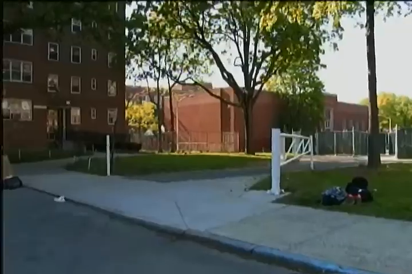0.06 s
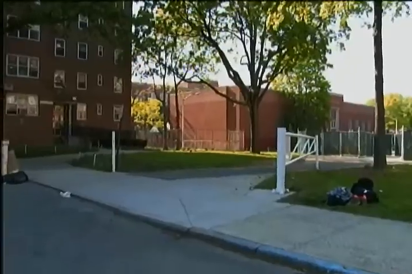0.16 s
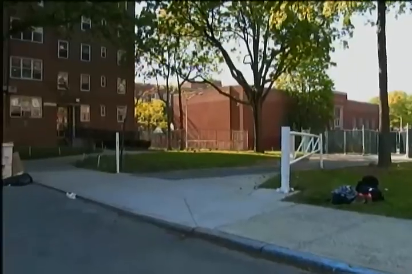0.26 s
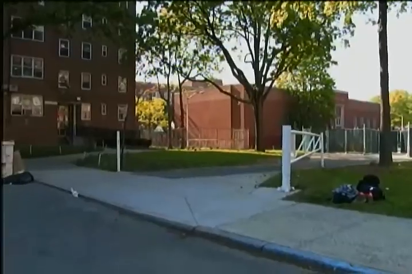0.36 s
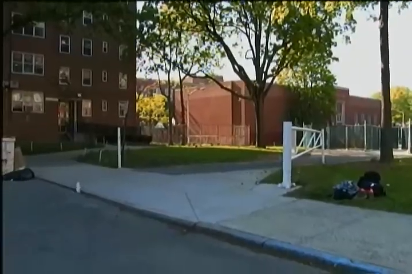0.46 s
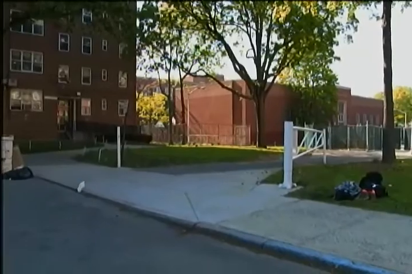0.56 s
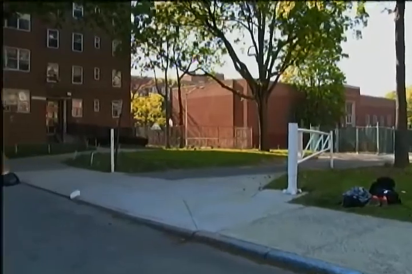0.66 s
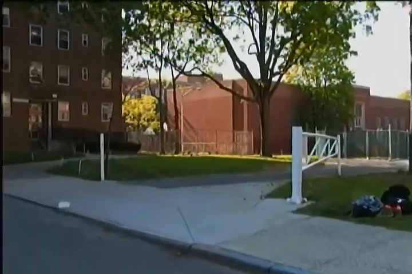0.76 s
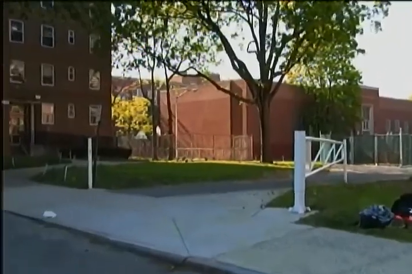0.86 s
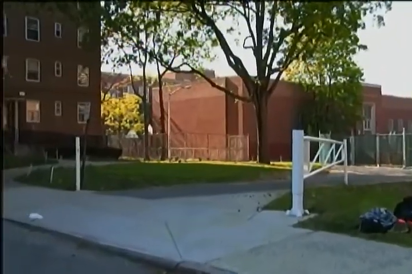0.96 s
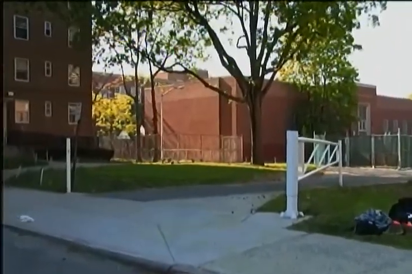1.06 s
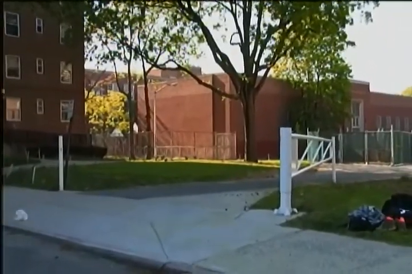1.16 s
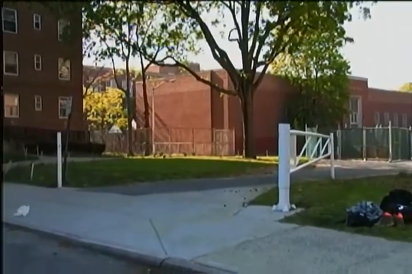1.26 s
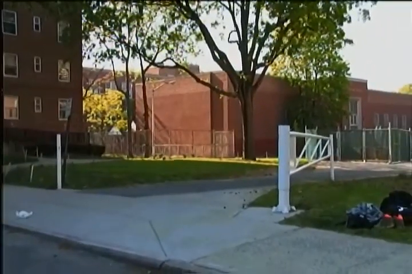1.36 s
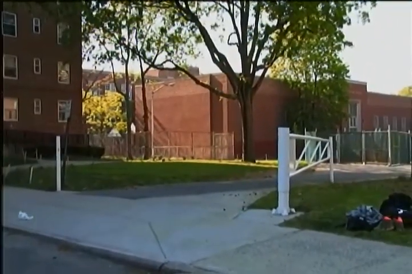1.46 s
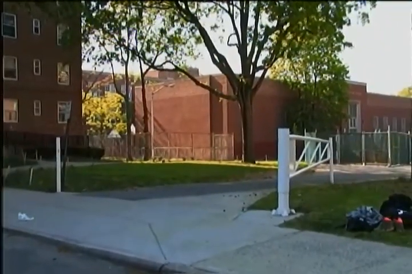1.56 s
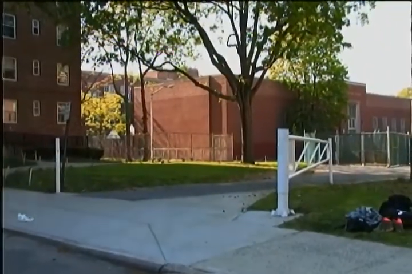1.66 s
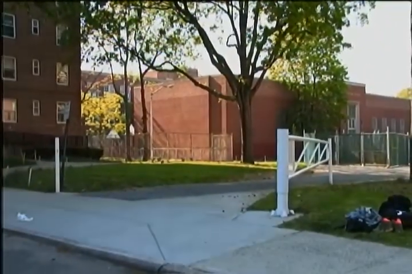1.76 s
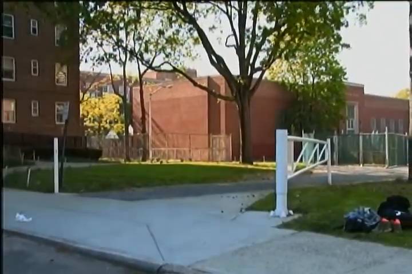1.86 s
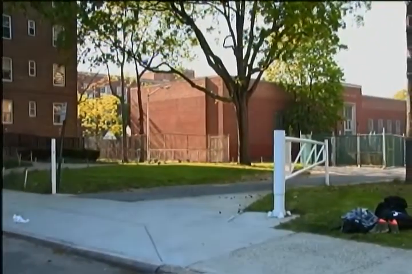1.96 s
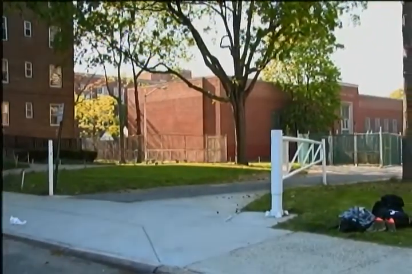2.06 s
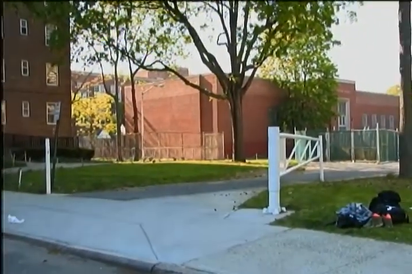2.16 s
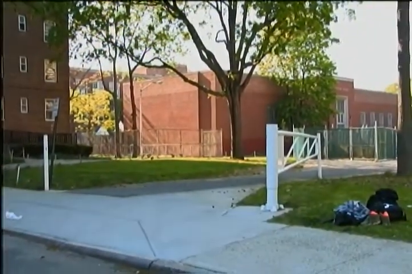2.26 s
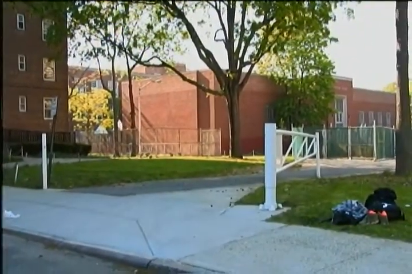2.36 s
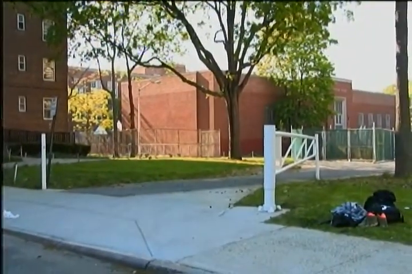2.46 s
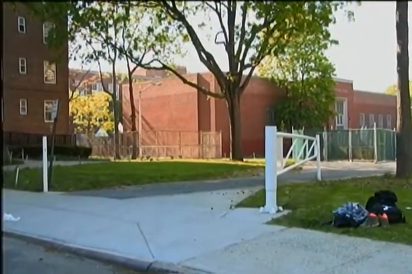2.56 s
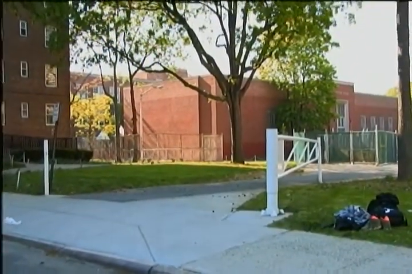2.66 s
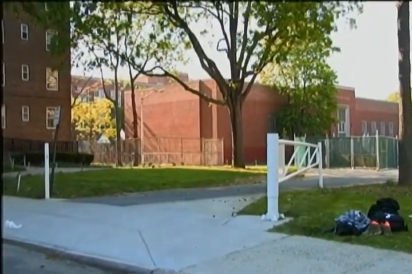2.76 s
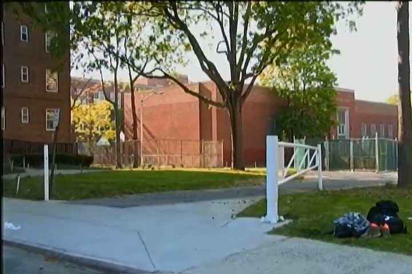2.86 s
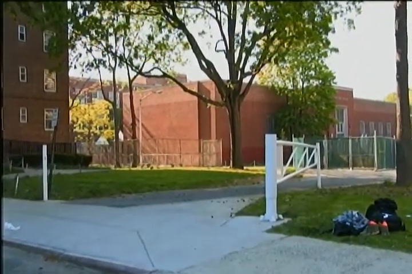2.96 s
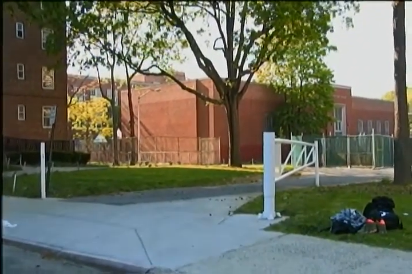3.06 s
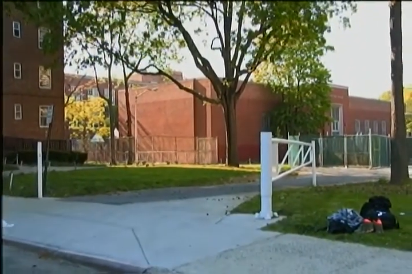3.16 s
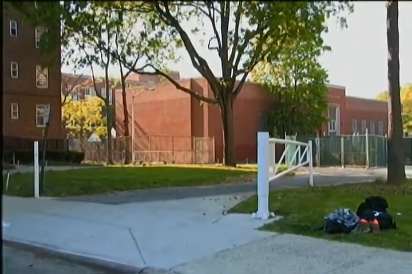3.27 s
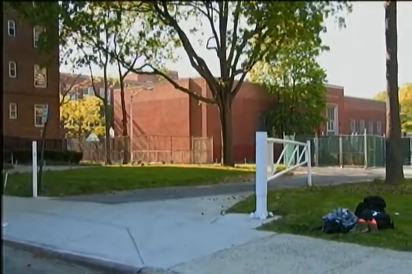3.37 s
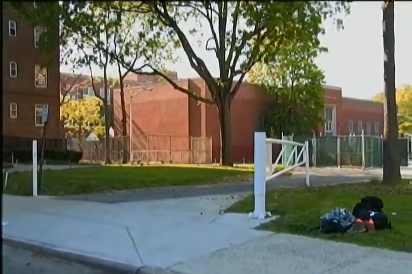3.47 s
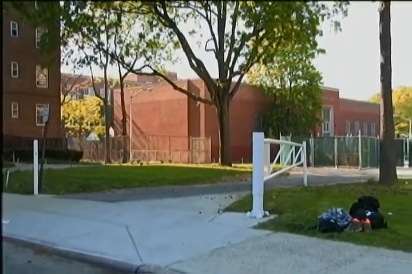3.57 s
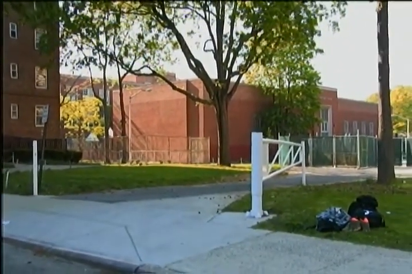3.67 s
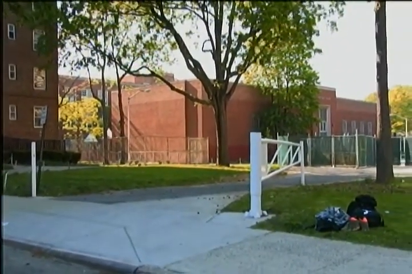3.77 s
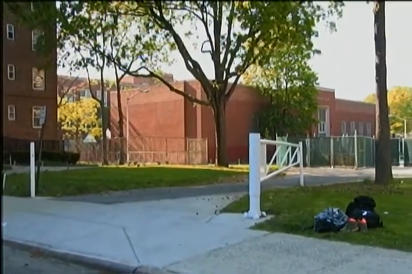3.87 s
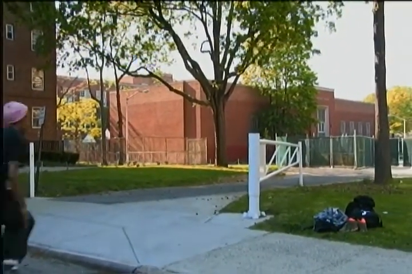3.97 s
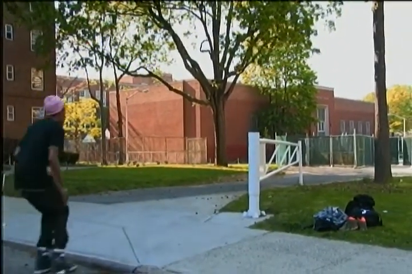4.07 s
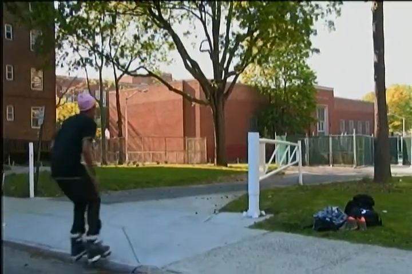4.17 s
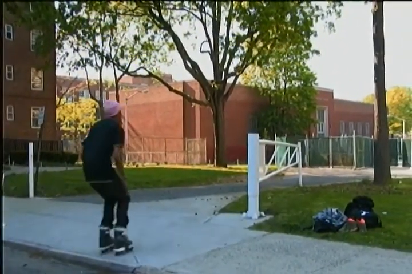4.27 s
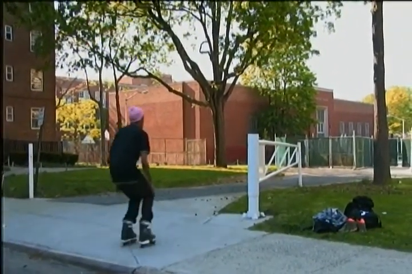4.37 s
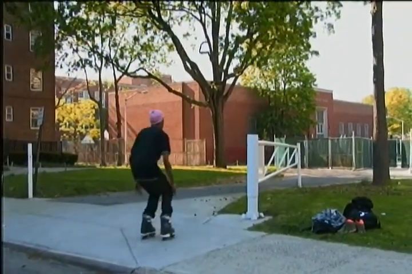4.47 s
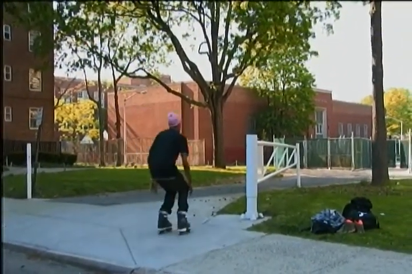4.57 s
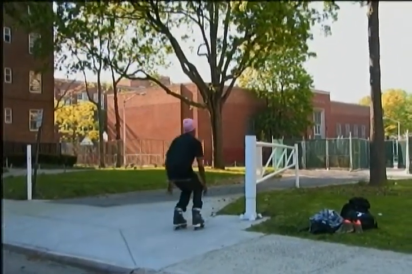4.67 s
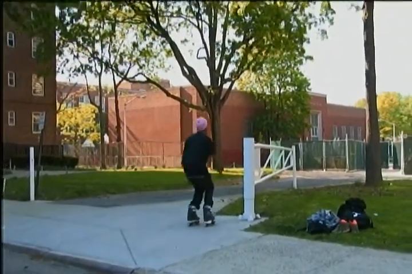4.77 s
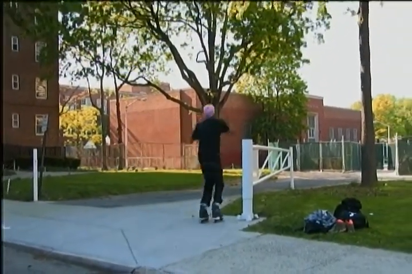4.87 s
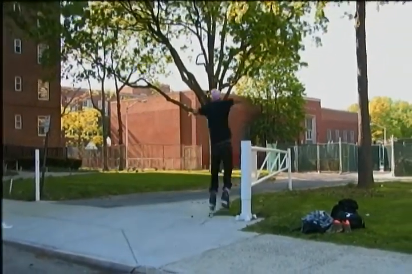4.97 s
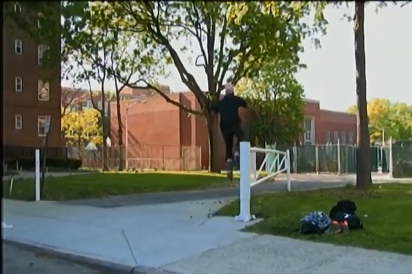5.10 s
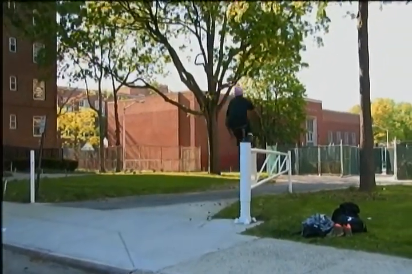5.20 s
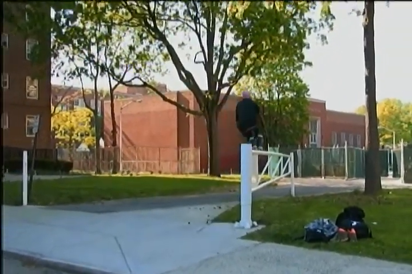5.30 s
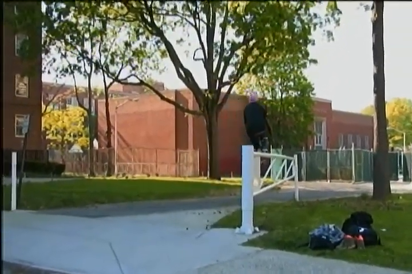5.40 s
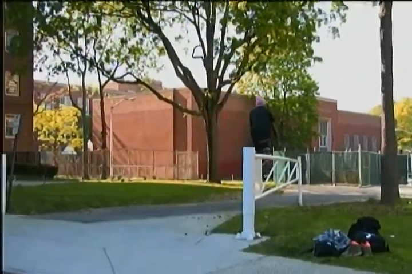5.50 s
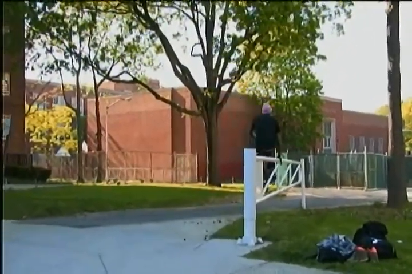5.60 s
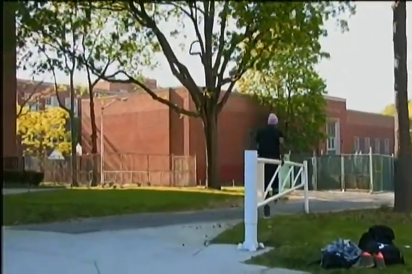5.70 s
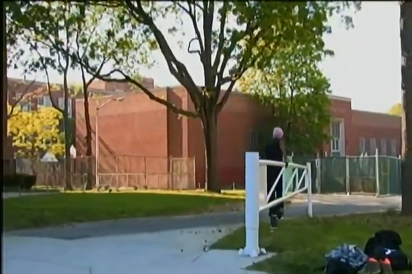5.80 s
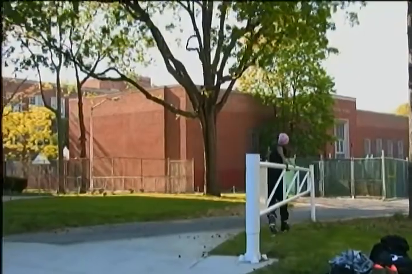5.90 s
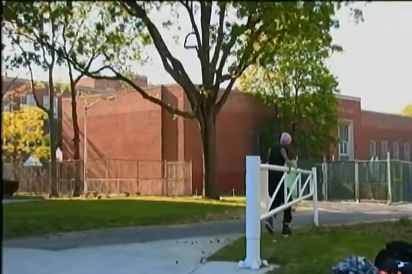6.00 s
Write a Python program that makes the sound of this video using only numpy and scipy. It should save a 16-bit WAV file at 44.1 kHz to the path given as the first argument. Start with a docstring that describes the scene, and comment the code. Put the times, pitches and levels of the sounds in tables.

```python
"""Inline skater grinds a gate.

Wheels roll up a quiet asphalt street from the left, hop the kerb and clack over sidewalk joints.
After a leap the soles grind along a hollow steel gate, whose tubes ring, and the skates thud on grass.
Far traffic rumbles, wind puffs on the microphone and brick walls throw back a faint echo."""
import sys
import numpy as np
from scipy import signal
from scipy.fft import rfft, irfft, next_fast_len
from scipy.io import wavfile
from scipy.ndimage import map_coordinates

SR = 44100
rng = np.random.default_rng(int(sys.argv[2]) if len(sys.argv) > 2 else 0)


def store_pcm(level_fs):
    """Save levels as 16-bit WAV."""
    pcm = np.round(np.clip(level_fs, -1, 1) * 32767).astype(np.int16)
    wavfile.write(sys.argv[1], SR, np.atleast_2d(pcm).T)


N = 266348
TIME = np.arange(N) / SR
SPEED_M_PER_S, NEAREST_M, NEAREST_S = 4.37, 3.1, 4
HOP_S, SIDEWALK_S, LEAP_S = 4.05, 4.25, 4.745


def rolling():
    """Wheels ride over stones and sand, which shake the frames and boot shells."""
    level_db = wheel_level_db()
    beyond_m = distance_m() - NEAREST_M
    load = drift(per_s=70)    # uneven ground varies the wheel pressure
    stones = grains(per_s=1300, spread_db=2.5)
    sand = grains(per_s=1800, spread_db=4)
    return ground_reflection(rumble(level_db, load, stones)
                             + roar(level_db, load, stones, beyond_m)
                             + grit(level_db, load, stones, sand, beyond_m))


# Wheel drive on asphalt: (time [s], level [dB])
ASPHALT_DRIVE = [(0.0, -58.5), (0.33, -57), (0.6, -53), (0.68, -46.5), (0.86, -45.5), (0.99, -45),
                 (1.15, -48.5), (1.27, -48.5), (1.45, -50.5), (1.62, -48.5), (1.72, -51), (1.98, -49),
                 (2.09, -43), (2.25, -40.5), (2.47, -35), (2.7, -35.5), (2.88, -35.5), (2.99, -39),
                 (3.08, -35), (3.35, -32.5), (3.55, -35), (3.64, -40), (3.71, -35), (3.8, -36.5),
                 (3.91, -37.5), (4.0, -37)]


def wheel_level_db(hop_fall_db_per_s=312, concrete_db=-50, leap_fall_db_per_s=41):
    """Loud on asphalt, dying away in the hop, softer on concrete, spinning out in the leap."""
    asphalt_db, = in_time(ASPHALT_DRIVE)
    street_db = asphalt_db + 1 - hop_fall_db_per_s * since(HOP_S)
    sidewalk_db = concrete_db - leap_fall_db_per_s * since(LEAP_S)
    return np.where(TIME < SIDEWALK_S, street_db, sidewalk_db)


# Rumble spectrum: (frequency [Hz], density [dB])
RUMBLE_SPECTRUM = [(35, -28), (60, -11), (130, -6.5), (220, -1), (310, 0.5), (540, -3), (750, -11.5),
                   (1200, -22.5), (2500, -57)]
# Hollow-sounding drone in the rolling: (time [s], centre [Hz], gain [dB])
ROLLING_DRONE = [(0.0, 506, -16), (2.0, 478, -4), (2.55, 502, -5), (2.72, 383, -10), (2.86, 340, 1),
                 (2.96, 415, -11), (3.1, 302, -5), (3.21, 370, -7), (3.33, 436, -10), (3.46, 262, -3),
                 (3.57, 251, -2), (3.68, 272, -8), (4.0, 255, -0.5), (4.25, 270, -20)]


def rumble(level_db, load, stones):
    """Rough ground shakes the wheels; a drone wavers and falls in pitch as the skater nears."""
    drone_hz, drone_db = in_time(ROLLING_DRONE)
    drone = from_db(drone_db) * swept(grains(per_s=3000, spread_db=0.5), drone_hz, width_hz=51)
    roughness = 0.81 * grains(per_s=700, spread_db=0.5) + 0.71 * stones
    return from_db(level_db + 0.21 * load) * (0.8 * coloured(roughness, RUMBLE_SPECTRUM) + drone)


# Roar spectrum: (frequency [Hz], density [dB])
ROAR_SPECTRUM = [(400, -17), (750, 3.5), (950, 3.5), (1200, -1.5), (1650, -1), (2000, -2), (2270, 8),
                 (2600, -5), (3100, -16.5), (5000, -29)]
# Boot shell resonances: (centre [Hz], width [Hz], gain [dB])
SHELL_MODES = [(720, 90, -11), (1230, 120, -10), (1700, 180, -14), (2280, 170, -6)]


def roar(level_db, load, stones, beyond_m, loss_db_per_m=0.27):
    """Stones drive the boot shells into a surging roar."""
    mean_db = level_db - 5.5 - loss_db_per_m * beyond_m
    flutter_db = 1.2 * load + drift(per_s=16)
    shells = 0.86 * coloured(stones, ROAR_SPECTRUM) + wandering_modes(stones, SHELL_MODES)
    return from_db(mean_db + flutter_db) * shells


# Grit spectrum: (frequency [Hz], density [dB])
GRIT_SPECTRUM = [(1200, -5), (3000, -4), (4000, 3), (5300, -12), (7000, -8.5), (9000, -7.5), (10500, -7),
                 (12000, -7), (16000, -24)]
# Wheel and bearing resonances: (centre [Hz], width [Hz], gain [dB])
BEARING_MODES = [(3450, 250, -11), (4150, 250, -9), (6800, 400, -19)]


def grit(level_db, load, stones, sand, beyond_m, loss_db_per_m=2.5, concrete_boost_db=2):
    """Grit hisses under the wheels and rings the bearings; it fades fast with distance."""
    mean_db = level_db - 12.5 - loss_db_per_m * beyond_m + concrete_boost_db * (TIME > SIDEWALK_S)
    flutter_db = 1.6 * load + 2 * drift(per_s=250)
    hiss = coloured(0.45 * stones + 0.67 * sand, GRIT_SPECTRUM)
    return from_db(mean_db + flutter_db) * (hiss + wandering_modes(sand, BEARING_MODES))


# Strikes on cracks, stones, kerb and joints:
# (time [s], thump [dB], clack [dB], crack [dB], frame ring [Hz], wheel ring [Hz])
WHEEL_STRIKES = [(0.0795, -48, -44, -60, 2170, 2750), (0.328, -44, -44.5, -66, 1120, 2600),
                 (0.374, -43.5, -43, -72, 1480, 2950), (0.638, -34.5, -35.5, -54, 650, 3450),
                 (0.677, -36.5, -32, -46.5, 1250, 2700), (0.786, -44, -39.5, -64, 2190, 2600),
                 (0.805, -37, -37, -65, 1590, 2600), (0.949, -36.5, -39.5, -57, 1200, 2600),
                 (1.016, -37, -48, -59, 1840, 2720), (1.046, -40, -44.5, -60, 2240, 2780),
                 (1.07, -40, -31.5, -60, 2240, 2600), (1.083, -44, -38, -60, 1260, 2750),
                 (1.092, -39, -44, -60, 1120, 2600), (1.122, -37, -34.5, -40, 1820, 2880),
                 (1.332, -36.5, -39, -53, 1300, 3300), (1.348, -44, -39, -56, 1140, 2670),
                 (1.379, -35, -32.5, -40, 1240, 7050), (1.528, -35.5, -39.5, -53, 550, 2780),
                 (1.792, -43, -42, -58, 1250, 2750), (1.823, -42, -41, -57, 1200, 2620),
                 (1.839, -38.5, -36.5, -58, 1380, 3250), (2.28, -37, -30.5, -55, 2280, 2860),
                 (2.314, -34, -29.5, -48, 800, 3200), (2.812, -40, -34, -44, 2240, 2580),
                 (2.863, -40, -32, -45, 1190, 2570), (3.212, -39, -33, -36.5, 2300, 2700),
                 (3.672, -35, -28, -39, 2100, 3980), (3.754, -34, -31.5, -44, 1050, 3600),
                 (3.842, -33, -34, -40, 800, 3990), (3.851, -33, -38, -48.5, 2300, 3580),
                 (3.955, -30, -30, -34, 1190, 3500), (3.986, -31.5, -31, -46, 1100, 2840),
                 (3.993, -28.5, -44, -38, 800, 7000), (4.007, -48, -25.5, -34, 1250, 4060),
                 (4.032, -30.5, -27, -30.5, 2360, 3630), (4.043, -30, -24.5, -40, 1930, 3600),
                 (4.054, -39, -31, -58, 2200, 2600), (4.208, -37, -30, -34.5, 1150, 4060),
                 (4.232, -28.5, -29.5, -37.5, 630, 4360), (4.241, -29.5, -32, -38, 1070, 4220),
                 (4.248, -30.5, -43, -36, 2270, 3370), (4.264, -37, -32, -37.5, 1090, 4540),
                 (4.324, -40, -33.5, -47, 1120, 4040), (4.333, -35, -37, -41.5, 590, 4800),
                 (4.392, -44, -35, -39, 1980, 3250), (4.4681, -39.5, -34.5, -43, 2080, 3980),
                 (4.486, -40, -31, -42, 2130, 4400), (4.494, -39, -43, -47, 2190, 3380),
                 (4.5253, -39, -30.5, -42, 1070, 4100), (4.551, -43, -32, -39, 2140, 3500),
                 (4.709, -38.5, -33.5, -43.5, 1120, 3270), (4.783, -42, -32.5, -36, 1160, 3190)]
# Boot thump spectrum: (frequency [Hz], density [dB])
THUMP_SPECTRUM = [(40, -16), (90, -2), (160, 1.5), (270, 4), (400, -7.5), (560, -2.5), (900, -25.5),
                  (2500, -36)]
# Frame clack spectrum: (frequency [Hz], density [dB])
CLACK_SPECTRUM = [(200, 0), (600, 7.5), (900, -1), (1220, 0.5), (1600, -5), (2200, 3.5), (2700, -8.5),
                  (4200, -13.5), (8000, -18), (15000, -43)]
# Wheel crack spectrum: (frequency [Hz], density [dB])
CRACK_SPECTRUM = [(1500, -14), (2700, -1), (4000, 2), (5300, -5), (7000, -3), (10000, -5.5), (12000, -9),
                  (15500, -24)]


def bumps():
    """A wheel meets an edge: the boot thumps, the frame clacks, the wheel cracks; both ring briefly."""
    s, thump_db, clack_db, crack_db, frame_hz, wheel_hz = np.transpose(WHEEL_STRIKES)
    thump = pushes(s + 0.00075, thump_db + 0.5) + blows(s + 0.0019, thump_db - 4.5, contact_s=0.0063)
    scuff = blows(s - 0.003, clack_db - 17, contact_s=0.00034)
    clack = (pushes(s + 0.0005, clack_db - 12.5)
             + blows(s, clack_db - 6, contact_s=0.0013)
             + blows(s + 0.00204, clack_db - 9.5, contact_s=0.0045))
    crack = (blows(s - 0.003, crack_db - 17, contact_s=0.0008)
             + blows(s, crack_db - 4, contact_s=0.00094)
             + blows(s + 0.001013, crack_db - 14.5, contact_s=0.0015))
    frame_ring = pings(s + 0.0007, clack_db - 2, frame_hz, t60_s=0.021)
    wheel_ring = pings(s + 0.0007, crack_db + 6, wheel_hz, t60_s=0.01)
    return (coloured(thump, THUMP_SPECTRUM) + coloured(scuff + clack, CLACK_SPECTRUM)
            + coloured(crack, CRACK_SPECTRUM) + frame_ring + wheel_ring)


def pebbles(per_s=14, gain_db=-6, spread_db=2):
    """Wheels crunch over loose stones at random until the leap."""
    gap_draw, size_draw = rng.random((200, 2)).T
    s = np.cumsum(-np.log(1 - gap_draw)) / per_s
    db = np.interp(s, TIME, wheel_level_db()) + gain_db + spread_db * (2 * size_draw - 1)
    return coloured(blows(s[s < LEAP_S], db[s < LEAP_S], contact_s=0.0012), CLACK_SPECTRUM)


def sand_ticks(per_s=220, band_hz=(5600, 11000), gain_db=-14.5):
    """Single sand grains tick under the wheels on smooth concrete."""
    ticks = rms_one(signal.sosfilt(bandpass(2, band_hz), grains(per_s, spread_db=4) + 1e-18))
    return from_db(wheel_level_db() + gain_db) * (TIME > SIDEWALK_S) * ticks


# Sideways slips: (time [s], half-length [s], level [dB], centre [Hz], width [Hz])
WHEEL_SKIDS = [(0.658, .025, -53, 1210, 500), (1.091, 0.035, -47, 1280, 497), (2.82, .03, -45.5, 3700, 900),
               (2.919, 0.009, -44, 3650, 900), (3.294, .07, -48, 10500, 500),
               (4.039, 0.0099, -39.5, 9050, 2200), (4.246, 0.0057, -53, 8500, 1800)]


def skids():
    """Wheels scuff sideways over grit."""
    out = np.zeros(N)
    for s, half_length_s, db, hz, width_hz in WHEEL_SKIDS:
        envelope = from_db(db) * np.exp(-((TIME - s) / half_length_s) ** 2)
        out += envelope * swept(grains(per_s=2500, spread_db=2), np.full(N, hz), width_hz)
    return out


# Boot and frame knocks on the gate: (time [s], knock [dB], favoured mode [Hz], ring [dB])
GATE_KNOCKS = [(5.238, -17.5, 529, -35.5), (5.255, -19, 1561, -26), (5.274, -21, 720, -29),
               (5.334, -22.5, 868, -33), (5.398, -24, 282, -36.5), (5.452, -30, 222, -28.5),
               (5.505, -20.5, 1225, -21), (5.514, -18, 1561, -28.5), (5.549, -17, 640, -29.5),
               (5.563, -18, 1225, -24), (5.574, -22, 640, -22.5), (5.604, -26, 222, -25),
               (5.743, -28, 222, -30), (5.77, -33, 1225, -42), (5.946, -35, 1092, -48)]
# Low grind spectrum: (frequency [Hz], density [dB])
BOOM_SPECTRUM = [(40, -23), (110, -12), (150, -23), (190, 0), (222, -9.5), (255, -8.5), (295, -5.5),
                 (370, -15.5), (700, -20.5)]
# Middle grind spectrum: (frequency [Hz], density [dB])
SCRAPE_SPECTRUM = [(300, -17), (460, -10), (560, -12), (645, 1.5), (760, -13), (1000, -9), (1220, -4),
                   (1330, -19), (1600, -11), (1850, -15), (3500, -19.5)]
# High grind spectrum: (frequency [Hz], density [dB])
HISS_SPECTRUM = [(1200, -17), (2300, -1.5), (3100, -5.5), (4500, 2.5), (5300, -11), (6600, 1.5), (7800, -9),
                 (9000, -1), (11000, -3.5), (15500, -27)]


def grind(judder_db=1.4):
    """Soles judder and knock along the gate; friction sets its tubes booming and ringing."""
    forces = sliding_forces() * from_db(judder_db * drift(per_s=110))
    low, middle, high = forces
    slips = middle * from_db(-5) * grains(per_s=1500, spread_db=1)
    s, knock_db, _, _ = np.transpose(GATE_KNOCKS)
    knocks = blows(s, knock_db - 11, contact_s=0.0029)
    brightness_db = 0.5 * (knock_db - knock_db.max())    # hard knocks are brighter
    cracks = blows(s, knock_db - 17.5 + brightness_db, contact_s=0.013)
    boom = coloured(low * from_db(1.8) * grains(per_s=4000, spread_db=-2), BOOM_SPECTRUM)
    scrape = coloured(slips + knocks, SCRAPE_SPECTRUM)
    rasp = high * from_db(-8) * grains(per_s=7000, spread_db=0.8)
    hiss = coloured(rasp + cracks, HISS_SPECTRUM)
    friction = forces * rng.standard_normal(N)
    return boom + scrape + hiss + gate_ringing(friction + knocks) + struck_modes()


# Soles biting into the gate: (time [s], scrape [dB], brightness [dB])
SOLE_BITES = [(5.233, -27.5, 4.5), (5.256, -30.5, -3.5), (5.499, -30, 12.5), (5.547, -34.5, -11),
              (5.725, -41, -11)]


def sliding_forces(bite_s=0.005, off_rail_s=5.8, off_rail_fall_db_per_s=24):
    """Friction in three bands: each bite dies away, treble first, faster once off the rail."""
    s, db, bright_db = np.transpose(SOLE_BITES)
    low = swells(s, db - 15 - bright_db, bite_s, fall_db_per_s=19.5)
    middle = swells(s, db, bite_s, fall_db_per_s=41.5)
    high = swells(s, db - 6.5 + bright_db, bite_s, fall_db_per_s=141)
    return from_db(-off_rail_fall_db_per_s * since(off_rail_s)) * np.array([low, middle, high])


# Steel tube modes: (frequency [Hz], level [dB], t60 [s], extra drive further along the rail [dB])
GATE_MODES = [(222, -44, 0.22, 5), (282.3, -44, 0.22, -2.5), (529, -44, 0.6, -4), (599, -46, .35, 9),
              (640, -45, 0.13, 7), (720, -46, 0.25, -18), (770, -50, 0.5, -2), (800, -49, 0.5, 0),
              (868, -48, 0.3, -7), (938, -52, 0.35, -16), (1025, -55, 0.2, 2), (1092, -52, 0.35, -7),
              (1203, -52, 0.25, 6), (1225, -51, 0.12, 3), (1313, -58, 0.2, 9), (1561, -53, 0.17, -3),
              (1677, -54, 0.2, 11), (2200, -58, 0.12, -4), (2845, -58, 0.12, 5), (3470, -59, 0.12, -6),
              (4290, -59, 0.08, 4), (4745, -58.5, 0.25, 7), (6436, -60.5, 0.25, 13), (6580, -60.5, 0.04, 2),
              (8970, -65, 0.05, 3)]


def gate_ringing(forces, start_s=5.2, crossovers_hz=(400, 2000), flutter_db=2.5):
    """Each force band drives its tube modes, which come and go as the soles pass their nodes."""
    out, start = np.zeros(N), int(start_s * SR)
    along_rail = np.interp(TIME[start:], [5.4, 5.5], [0, 1])
    for hz, db, t60_s, extra_db in GATE_MODES:
        force = forces[np.searchsorted(crossovers_hz, hz), start:]
        coupling = from_db(extra_db * along_rail + flutter_db * drift(per_s=25)[start:])
        out[start:] += from_db(db - 2.5) * rms_one(ring(force * coupling, hz, t60_s))
    return out


def struck_modes():
    """Each knock rings the tube mode that its spot favours."""
    s, _, near_hz, ring_db = np.transpose(GATE_KNOCKS)
    hz, _, t60_s, _ = np.transpose(GATE_MODES)
    mode = np.argmin(np.abs(hz - near_hz[:, None]), axis=1)
    return pings(s + 0.001986, ring_db, hz[mode], t60_s[mode])


# Stick-slip tone: (time [s], pitch [Hz], level [dB])
SOLE_SQUEAL = [(5.29, 1070, -100), (5.335, 1080, -49), (5.41, 1090, -56), (5.47, 1092, -38.5),
               (5.53, 1130, -49), (5.6, 1140, -100)]


def squeal():
    """A sole sticks and slips on the rail in a rough tone that creeps upward."""
    hz, db = in_time(SOLE_SQUEAL)
    return from_db(db) * swept(rng.standard_normal(N), hz, width_hz=20)


# Wheel and buckle chatter: (time [s], level [dB], centre [Hz])
LOOSE_PARTS = [(5.236, -27.5, 4000), (5.254, -33, 4300), (5.327, -36, 3260), (5.505, -34, 4260),
               (5.509, -25, 9200), (5.553, -29.5, 6700), (5.357, -32.5, 9700), (5.402, -38, 3440),
               (5.431, -41, 7000), (5.44, -44, 4400), (5.463, -48, 3200), (5.548, -26, 2440),
               (5.654, -46, 4200), (5.693, -38, 2580), (5.742, -44, 3260), (5.781, -42.5, 7200),
               (5.818, -41.5, 2420), (5.848, -54, 4400), (5.866, -45, 8800), (5.907, -48, 8900)]


def rattles(width_octaves=0.45):
    """Loose parts rattle in the grind and the drop, each in its own band."""
    out = np.zeros(N)
    for s, db, hz in LOOSE_PARTS:
        band_hz = hz * 2 ** (width_octaves * np.array([-0.5, 0.5]))
        chatter = blows([s], [db], contact_s=0.004) + 1e-18
        band_gain = np.sqrt(SR / 2 / np.ptp(band_hz)) / 2
        out += band_gain * signal.sosfilt(bandpass(1, band_hz), chatter)
    return out


# Touchdown on grass: (time [s], level [dB])
TOUCHDOWN = [(5.853, -31)]
# Thud spectrum: (frequency [Hz], density [dB])
THUD_SPECTRUM = [(50, -11), (120, 17), (250, -37), (700, -7.5)]


def landing():
    """Grass takes the skates with a dull thud."""
    s, db = np.transpose(TOUCHDOWN)
    return coloured(blows(s, db, contact_s=0.0046), THUD_SPECTRUM)


def distance_m():
    """Range to the microphone on a straight pass."""
    return np.hypot(NEAREST_M, SPEED_M_PER_S * (TIME - NEAREST_S))


def ground_reflection(x, nearest_lag_ms=1.094):
    """The pavement returns a weak copy; its lag grows as the skater nears, sweeping the colour down."""
    return 0.74 * (x + 0.12 * delayed(x, nearest_lag_ms * NEAREST_M / distance_m()))


def placed(x, cross_s=3.657, cross_width_s=0.11, left_db=6, ahead_db=0.5, lag_ms=0.1, undelayed=0.3):
    """From left to ahead: the far microphone port gets weaker mids, and most of its sound later."""
    on_left = 0.5 - 0.5 * np.tanh((TIME - cross_s) / (2 * cross_width_s))
    pan_db = ahead_db + (left_db - ahead_db) * on_left
    left, right = from_db(pan_db / 2), from_db(-pan_db / 2)
    mids = signal.sosfiltfilt(bandpass(1, band_hz=(450, 3000)), x)
    side = mids * (left - right) / (left + right)
    near, far = x + side, x - side
    return np.array([near, undelayed * far + (1 - undelayed) * delayed(far, lag_ms * on_left)])


# Echo colour of the house fronts: (frequency [Hz], gain [dB])
WALL_SPECTRUM = [(60, -37), (200, -31), (450, -1), (1200, -1), (2400, 1.5), (6000, 2), (15000, 3.5)]


def street_echo(x, t60_s, early_db, late_db):
    """Scatter near the microphone, then a thin tail from the house fronts, different at each port."""
    t = np.arange(SR) / SR
    early, late = rng.standard_normal((2, 2, SR))
    early = rms_one(early[0] * (t > 0.0015) * np.exp(-t / 0.0045)) * np.array([[1], [-1]])
    late = rms_one(late * (t > 0.015) * from_db(-60 * t / t60_s))
    response = (from_db(early_db) * early + from_db(late_db) * late) / np.sqrt(SR)
    return signal.fftconvolve(coloured(x, WALL_SPECTRUM)[None], response, axes=1)[:, :N]


# Puffs on the microphone: (time [s], level [dB])
WIND_PUFFS = [(0.755, -40), (1.05, -45)]
# Wind spectrum: (frequency [Hz], density [dB])
WIND_SPECTRUM = [(15, -66), (28, -41), (46, 9.5), (70, -11), (150, -7), (400, -55)]


def wind(breeze_db=-77):
    """Puffs buffet the microphone over a light breeze."""
    s, db = np.transpose(WIND_PUFFS)
    envelope = from_db(breeze_db) + swells(s, db, rise_s=0.023, fall_db_per_s=88)
    return envelope * rms_one(coloured(port_noise(), WIND_SPECTRUM))


# Far traffic spectrum: (frequency [Hz], density [dB])
TRAFFIC_SPECTRUM = [(25, -39), (45, -0.5), (75, -2), (170, 1), (350, -11.5), (620, -9.5), (950, -16),
                    (2300, -25), (3100, -35), (4100, -31.5), (5400, -43), (7500, -41), (11000, -45),
                    (15500, -46)]


def traffic(level_db=-52.5):
    """Far traffic blends into a steady rumble."""
    return from_db(level_db) * coloured(port_noise(), TRAFFIC_SPECTRUM)


def from_db(db):
    """Decibels to gain."""
    return 10 ** (np.asarray(db) / 20)


def rms_one(x):
    """Scale to unit rms."""
    return x / np.sqrt(np.mean(x ** 2) + 1e-20)


def since(s):
    """Seconds after a moment, zero before it."""
    return np.maximum(TIME - s, 0)


def in_time(rows):
    """Each column of a curve, sample by sample."""
    s, *columns = np.transpose(rows)
    return [np.interp(TIME, s, column) for column in columns]


def drift(per_s):
    """Random wander of unit rms."""
    knots = rng.standard_normal(4000)
    return rms_one(np.interp(TIME * per_s, np.arange(len(knots)), knots))


def port_noise(apart=0.023):
    """White noise, almost alike at both ports."""
    return rng.standard_normal(N) + apart * rng.standard_normal((2, N))


def grains(per_s, spread_db):
    """Tiny collisions of random size with a rough surface; unit rms."""
    sizes = from_db(spread_db * np.minimum(rng.exponential(1, N), 5))
    return rms_one(sizes * rng.choice([-1, 1], N) * (rng.random(N) < per_s / SR))


def blows(times_s, levels_db, contact_s):
    """Brief chatters of contact; level is energy as rms over 4 ms."""
    t, out = np.arange(SR // 10) / SR, np.zeros(N + SR)
    shape = (t / contact_s + 0.065) * np.exp(-t / contact_s)
    for s, db, chatter in zip(times_s, levels_db, rng.standard_normal((len(times_s), len(t)))):
        burst, at = chatter * shape, int(s * SR)
        out[at:at + len(t)] += from_db(db) * burst * np.sqrt(0.004 * SR / np.sum(burst ** 2))
    return out[:N]


def pushes(times_s, levels_db):
    """Clean impulses; level is rms over 4 ms."""
    out = np.zeros(N)
    out[(np.asarray(times_s) * SR).astype(int)] = from_db(levels_db) * np.sqrt(0.004 * SR)
    return out


def pings(times_s, levels_db, hz, t60_s):
    """One damped tone per strike; level is starting amplitude."""
    t, out = np.arange(SR // 2) / SR, np.zeros(N + SR)
    for s, db, pitch_hz, decay_s in np.broadcast(times_s, levels_db, hz, t60_s):
        at = int(s * SR)
        out[at:at + len(t)] += from_db(db - 60 * t / decay_s) * np.sin(2 * np.pi * pitch_hz * t)
    return out[:N]


def swells(times_s, levels_db, rise_s, fall_db_per_s):
    """Envelope of events that rise and die away; powers add."""
    age_s = TIME - np.asarray(times_s)[:, None]
    falling_db = np.asarray(levels_db)[:, None] - fall_db_per_s * np.maximum(age_s - rise_s, 0)
    each = np.clip(age_s / rise_s, 0, 1) * from_db(falling_db)
    return np.sqrt(np.sum(each ** 2, axis=0))


def coloured(x, spectrum, skirt_db_per_octave=12):
    """Minimum-phase body response that keeps the energy of a white input."""
    size = 2 * next_fast_len(N // 2 + SR // 8)
    hz, db = np.transpose(spectrum)
    grid_hz = np.maximum(np.arange(size // 2 + 1) * SR / size, 1)
    octaves_outside = np.abs(np.log2(grid_hz / np.clip(grid_hz, hz[0], hz[-1])))
    gain_db = np.interp(np.log(grid_hz), np.log(hz), db) - skirt_db_per_octave * octaves_outside
    cepstrum = irfft(np.log(rms_one(from_db(gain_db))))
    cepstrum[1:size // 2] *= 2    # fold onto positive time: causal
    cepstrum[size // 2 + 1:] = 0
    return irfft(rfft(x, size) * np.exp(rfft(cepstrum)), size)[..., :N]


def bandpass(order, band_hz):
    """Band filter sections."""
    return signal.butter(order, band_hz, "band", fs=SR, output="sos")


def ring(force, hz, t60_s):
    """One driven, damped mode."""
    radius, angle = from_db(-60 / (t60_s * SR)), 2 * np.pi * hz / SR
    return signal.lfilter([0, np.sin(angle)], [1, -2 * radius * np.cos(angle), radius ** 2], force)


def swept(x, centre_hz, width_hz, block=256):
    """Resonance with a movable centre; unit rms."""
    out, state = np.zeros(N), np.zeros(2)
    radius = np.exp(-np.pi * width_hz / SR)
    for i in range(0, N, block):
        poles = [1, -2 * radius * np.cos(2 * np.pi * centre_hz[i] / SR), radius ** 2]
        out[i:i + block], state = signal.lfilter([1, 0, -1], poles, x[i:i + block], zi=state)
    return rms_one(out)


def wandering_modes(force, modes, wander=0.035, flutter_db=2.5):
    """Skate resonances wander in pitch and level as the ankles flex."""
    out = np.zeros(N)
    for hz, width_hz, db in modes:
        gain = from_db(db + flutter_db * drift(per_s=25.2))
        out += gain * swept(force, hz * (1 + wander * drift(per_s=14)), width_hz)
    return out


def delayed(x, ms):
    """Variable delay."""
    return map_coordinates(x, [np.arange(N) - ms * SR / 1000], order=3, mode="nearest")


def scene():
    """Skater, street echo, traffic and wind in stereo."""
    wheels = rolling() + pebbles() + sand_ticks() + skids() + bumps()
    skater = wheels + grind() + squeal() + rattles() + landing()
    echo = street_echo(skater, t60_s=0.33, early_db=-14.5, late_db=-12)
    return placed(skater) + echo + traffic() + wind()


# Microphone response dips: (centre [Hz], width [Hz], gain [dB])
TREBLE_DIPS = [(2990, 280, -2.5), (5860, 500, -4), (11710, 8800, -11)]


def record(dry, cutoff_hz=15850):
    """A small microphone with treble dips and a steep top cut."""
    for hz, width_hz, db in TREBLE_DIPS:
        b, a = signal.iirpeak(hz, hz / width_hz, fs=SR)
        dry = dry + (from_db(db) - 1) * signal.lfilter(b, a, dry)
    return signal.sosfilt(signal.ellip(12, 0.1, 90, cutoff_hz, fs=SR, output="sos"), dry)


dry = scene()
out = record(dry)
store_pcm(out)
```